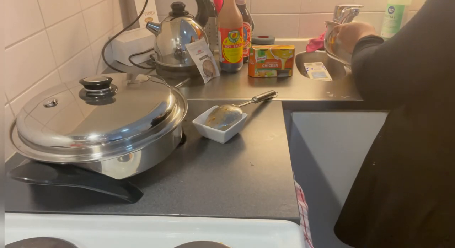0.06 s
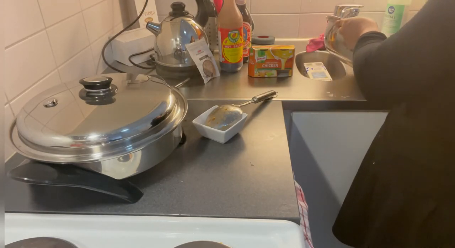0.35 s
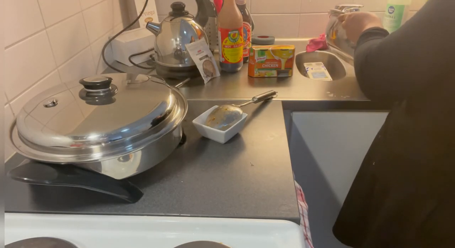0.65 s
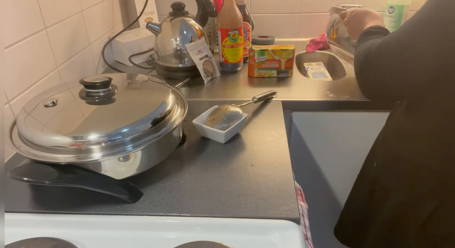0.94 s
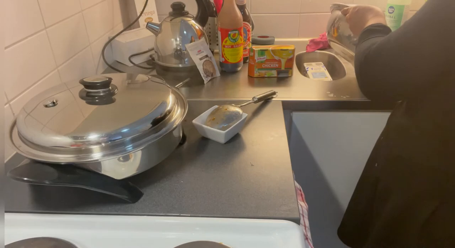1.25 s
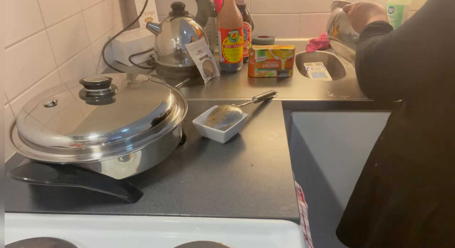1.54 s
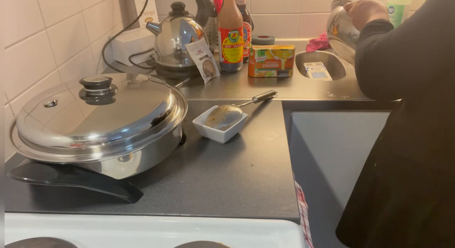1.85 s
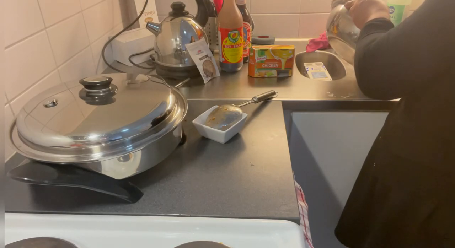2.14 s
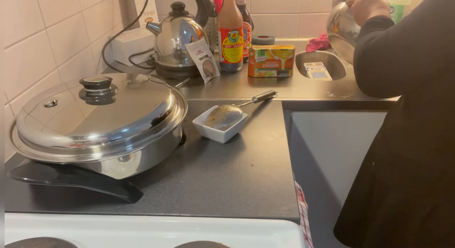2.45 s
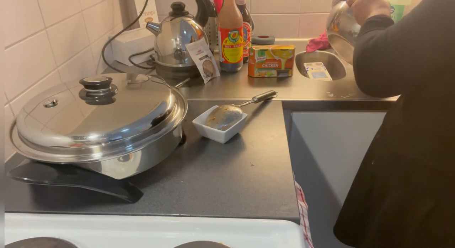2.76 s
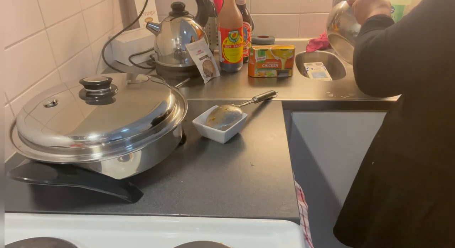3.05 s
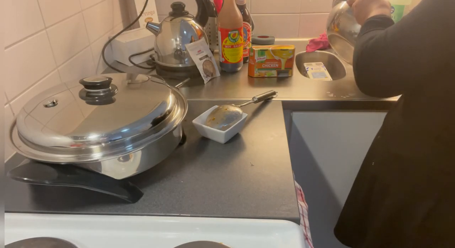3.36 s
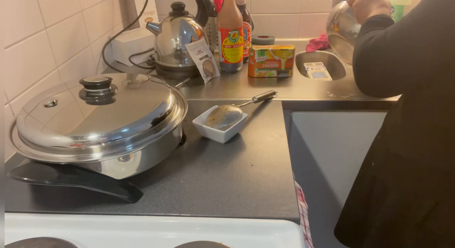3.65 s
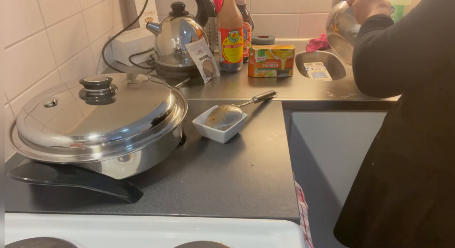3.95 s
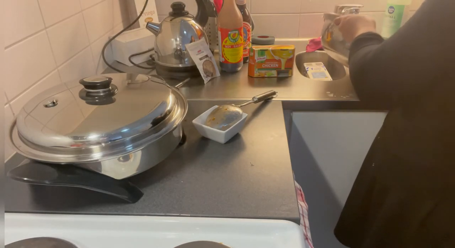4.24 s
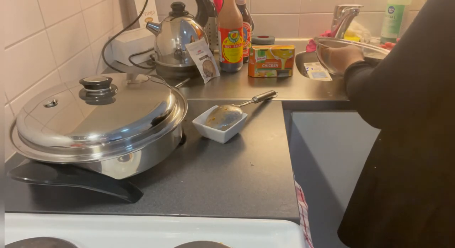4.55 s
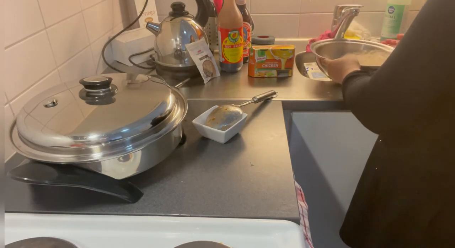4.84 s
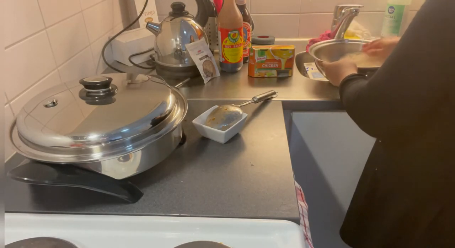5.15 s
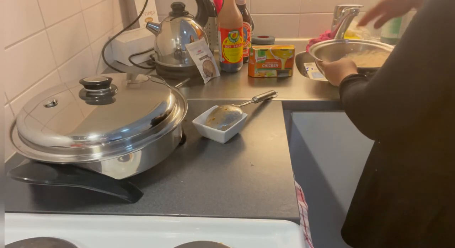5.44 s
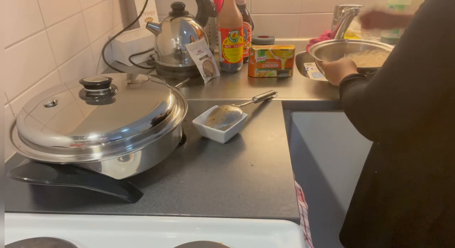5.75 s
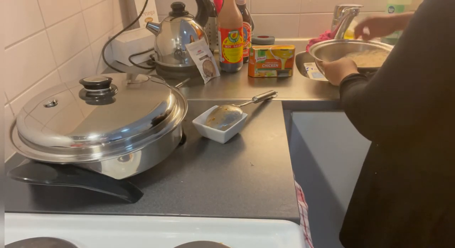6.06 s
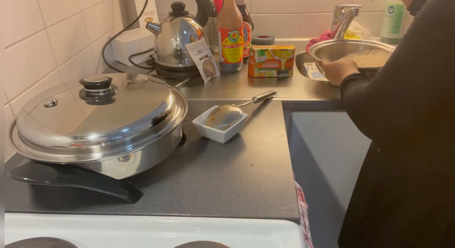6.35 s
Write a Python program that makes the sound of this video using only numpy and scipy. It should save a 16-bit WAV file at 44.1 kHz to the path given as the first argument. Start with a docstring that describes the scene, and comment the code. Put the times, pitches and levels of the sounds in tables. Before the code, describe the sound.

From the start, water pours from a steel bowl into a metal sink, splashing and fizzing with small ringing bubbles. The splash is fullest at about half a second and then gradually thins, while the water drums hollowly on the sink floor until about 3 seconds. Separate plinks and spatters stand out more as the stream dwindles, leaving faint drips by 4 seconds.

At about 4.3 seconds the bowl lands in the sink with a sharp, ringing clank and a low boom, the loudest sound. It is pushed along with an uneven low rumble from 4.5 to 5.4 seconds, knocking again at about 4.7 and 4.9 and settling with a light tap at 5.1. From 5.2 to 6.1 seconds a wet hand flicks a few faint drops onto the steel. The small tiled kitchen adds a short echo, and a low appliance hum continues throughout.

```python
"""Steel bowl emptied into a sink

Poured water splashes, fizzes with ringing bubbles, drums on the sink floor and thins to drips.
The bowl clanks down, ringing basin, sink and itself; it rocks, is pushed along and settles.
A wet hand flicks off a few drops. A small tiled kitchen rings briefly, over a low appliance hum."""
import sys
import numpy as np
from scipy import signal
from scipy.fft import rfft, irfft
from scipy.io import wavfile
from scipy.ndimage import uniform_filter1d

SR = 44100
rng = np.random.default_rng(int(sys.argv[2]) if len(sys.argv) > 2 else 0)


def dump_mix(stems):
    """Bounce the given channels to the path in sys.argv[1] as a 16-bit WAV at rate SR."""
    frames = np.atleast_2d(stems).T  # one column per channel
    limited = np.clip(frames, -1, 1)  # hard clip at full scale
    pcm = np.round(limited * 32767).astype(np.int16)
    wavfile.write(sys.argv[1], SR, pcm)


N = 282240

# appliance rumble: f/Hz, level/dB
HUM_SPECTRUM = [(12, -36.5), (20, -22.5), (101, 2.5), (195, -11), (281, -12.5), (338, -14.5), (375, -14.5),
                (555, -19.5), (600, -23.5), (1500, -25.5), (3850, -38.5), (4740, -38.5), (5550, -43),
                (7800, -50), (10400, -60), (13500, -97.5), (22000, -120)]
# sliding bowl: f/Hz, level/dB
SLIDE_SPECTRUM = [(30, -6.5), (80, 0), (130, 4.5), (190, -18), (290, -1.5), (430, -10), (700, -19.5),
                  (2500, -33), (9000, -47.5)]
# bowl on sink: t/s, force/dB, basin boom/dB, bowl ring/dB, rim-to-base tilt/s, hand damping/(dB/s)
BOWL_KNOCKS = [(4.3083, -13, -10, -40, 0.0066, 9), (4.715, -25.5, -14.5, -30, .011, 150),
               (4.785, -59, -25, -60, 0.0062, 260), (4.918, -34, -33, -20, .003, 24),
               (5.117, -48, -56, -40.5, .003, 3)]
# modes of basin floor, sink walls and bowl: f/Hz, level/dB, t60/s
BASIN_MODES = [(40, -17, .3), (73, -9, .4), (114, 0, .3), (138, -1, .1)]
SINK_MODES = [(203, -12, .35), (230, -12, .33), (291, -14, .42), (374, -5, .36), (402, -5, .17),
              (425, -5, .3), (462, -5, .17), (515, -6, .24), (603, -11, .3), (707, -9, .17),
              (947, -15, .18), (993, -16, .18), (1476, -21, .3), (1650, -21, .27), (1690, -19, .24),
              (2046, -21, .22), (2385, -24, .22), (2572, -26, .3), (3048, -27, .25), (3350, -30, .25),
              (4420, -32, .3), (5180, -33, .28), (6300, -33, .26), (7500, -32, .26)]
BOWL_MODES = [(286, -4, .08), (307, -6, .25), (420, -12, .2), (560, -10, .08), (842, -4, .16),
              (885, -8, .07), (955, -6, .1)]
# dense sheet-steel modes and contact crack: f/Hz, level/dB
CLATTER_SPECTRUM = [(100, -12), (170, -8), (240, -7), (320, -7), (410, 0), (520, -1), (620, -4), (780, -13),
                    (970, -7), (1250, -20), (1650, -15), (2200, -17), (3200, -26), (6000, -40)]
CRACK_SPECTRUM = [(500, -33.5), (1500, -1.5), (2300, 4.5), (3500, 8), (5000, 9.5), (7500, 5.5), (9500, -3),
                  (10500, -62)]
# contacts, relative to their knock: clatter/dB, crack/dB, ring/dB
RIM, BASE, SLAP, REBOUND = (-1.8, -12.5, -27.5), (0, -20, 0), (-9, -19.5, -27.5), (-23, -27, -21.5)
# droplet sprays on steel, from the bowl, then the hand: t/s, level/dB
SPRAYS = [(0.582, -29.5), (1.808, -35), (1.932, -36), (2.135, -39), (2.302, -41.5), (2.84, -43),
          (3.129, -44), (3.518, -47.5), (4.129, -52), (5.215, -50), (5.254, -50), (5.303, -57),
          (5.628, -50.5), (5.768, -51), (5.805, -42), (5.875, -54.5), (6.073, -54), (6.098, -51.5)]
# largest air pockets and drops: t/s, level/dB, f/Hz
LARGE_PLINKS = [(.226, -33, 4100), (.283, -28.5, 2014), (.585, -29.5, 2460), (.93, -33, 2306),
                (1.119, -33.5, 3990), (1.15, -30.5, 2520), (1.333, -37.5, 4380), (1.408, -32.5, 6730),
                (1.609, -36, 2300), (1.812, -36.5, 2220), (2.157, -38.5, 3430), (2.261, -40, 4600),
                (2.508, -49, 4100), (2.51, -44.5, 543), (2.643, -39, 2240), (2.838, -38, 5140),
                (3.131, -42, 4740), (3.174, -42, 6470), (3.947, -52.5, 4760), (4.169, -49, 2500)]
# splash envelope as the bowl empties: t/s, level/dB
SPLASH_ENVELOPE = [(0, -45), (.42, -40.5), (1.6, -48), (2.1, -53), (2.42, -59.5), (2.9, -60.5), (3.3, -70),
                   (4.25, -73.5)]
# splash, sink-floor drumming and bubble fizz: f/Hz, level/dB
SPLASH_SPECTRUM = [(400, -16.5), (700, -14.5), (1000, -9.5), (1500, -8), (2200, -10), (3000, -6),
                   (4200, -5), (5300, -9), (7000, -6), (8500, -6), (10400, -17.5)]
DRUM_SPECTRUM = [(200, -26), (300, 0.5), (450, 15), (600, 18), (760, -11), (980, 18.5), (1400, -33.5)]
FIZZ_SPECTRUM = [(1400, 0), (2400, 2.5), (4300, -.5), (6000, 4.5), (9500, -7)]
# stereo balance: f/Hz, left minus right/dB
BALANCE = [(30, -6), (110, 8), (200, 5.5), (330, -.5), (700, 1), (1500, -1), (3000, 1), (9000, 0)]

ROOM_T60_S, EMPTY_S = .42, 3.06


def undb(db):
    """Decibels to gain."""
    return 10 ** (np.asarray(db) / 20)


def unit(x):
    """Scale to unit rms."""
    return x / np.sqrt(np.mean(x ** 2))


def seconds(length_s):
    """Time axis."""
    return np.arange(int(length_s * SR)) / SR


def add(track, start_s, sound):
    """Mix a sound into a track."""
    i = max(int(start_s * SR), 0)
    track[..., i:i + sound.shape[-1]] += sound[..., :max(N - i, 0)]


def colour(x, spectrum):
    """Filter by points of f/Hz, level/dB."""
    hz, db = np.transpose(spectrum)
    bins_hz = np.fft.rfftfreq(x.shape[-1], 1 / SR)
    return irfft(rfft(x) * undb(np.interp(np.log(bins_hz + 1), np.log(hz), db)), x.shape[-1])


def diffuse(samples, alike_hz=480):
    """Diffuse stereo noise: alike in the bass, unrelated in the treble."""
    mid, side = rng.standard_normal((2, samples))
    side = signal.sosfilt(signal.butter(1, alike_hz, "high", fs=SR, output="sos"), side)
    return np.array([mid + side, mid - side])


def wander(rate_hz):
    """Smooth random drift, unit rms."""
    hold = int(SR / rate_hz)
    steps = np.repeat(rng.standard_normal(N // hold + 1), hold)[:N]
    return unit(uniform_filter1d(steps, hold))


def kitchen(x, direct_db, wet_db, early_db=3, early_t60_s=.072, left_lag_s=.00025):
    """Direct sound from the right, close reflections off sink and tiles, short room tail."""
    t = seconds(.43)
    decay = undb(-60 * t / ROOM_T60_S) + undb(early_db - 60 * t / early_t60_s)
    tail = diffuse(len(t), alike_hz=330) * decay * (t > .001)
    response = undb(wet_db) * tail / np.sqrt(np.sum(tail ** 2) / 2)
    response[0, int(left_lag_s * SR)] += undb(direct_db)
    response[1, 0] += undb(direct_db)
    return signal.fftconvolve(x[None], response, axes=1)


def hum(rumble_db=-53.5, tone_hz=97, tone_db=-66.5, waver_db=2):
    """Appliance: rumble and one wavering low tone."""
    rumble = unit(colour(diffuse(N), HUM_SPECTRUM)) * undb(rumble_db + .67 * wander(5.4))
    phase = 2 * np.pi * np.cumsum(tone_hz * (1 + .01155 * wander(3.054))) / SR
    tone = unit(np.sin(phase) * undb(waver_db * wander(6.4)))
    return rumble + tone * undb(tone_db)


def slide(start_s=4.5, end_s=5.373, level_db=-47, judder_db=3):
    """The bowl, pushed along the sink, rumbles unevenly."""
    effort = np.interp(np.arange(N) / SR, [start_s, start_s + .028, end_s - .35, end_s], [0, 1, 1, 0])
    rumble = unit(colour(diffuse(N), SLIDE_SPECTRUM))
    return rumble * effort * undb(level_db + judder_db * wander(29))


def ring(modes, t):
    """Struck steel: decaying sines, higher modes further apart in stereo phase."""
    out = 0
    for k, (hz, db, t60_s) in enumerate(modes):
        spread_rad = min(hz / 800, 1) * (.4 + rng.random()) * np.array([[-1], [1]])
        sign = (-1) ** k if hz > 350 else 1  # upper modes start in alternate directions
        out = out + sign * undb(db - 60 * t / t60_s) * np.sin(2 * np.pi * hz * t + spread_rad)
    return out


def impact_noise(spectrum, t, t60_s, tail_db):
    """Noise of a blow: a quick decay hands over to the room tail."""
    decay = undb(-60 * t / t60_s) + undb(tail_db - 60 * t / ROOM_T60_S)
    return unit(colour(diffuse(len(t)), spectrum)) * decay


def knocks(sink_db=1, rebound_s=.04):
    """Rim touches, base lands, far edge slaps, bowl rebounds; the steel rings, damped by the hands."""
    out, t = np.zeros((2, N)), seconds(.73)
    attack = 1 - np.exp(-t / .0022)
    basin = ring(BASIN_MODES, t) * (1 - np.exp(-t / .004))
    sink = ring(SINK_MODES, t) * attack
    bowl = ring(BOWL_MODES, t) * attack
    for start_s, force_db, boom_db, bowl_db, tilt_s, damping_db_per_s in BOWL_KNOCKS:
        modes = undb(boom_db) * basin + undb(force_db + sink_db) * sink + undb(bowl_db) * bowl
        modes *= undb(-damping_db_per_s * t)
        contacts = [(0, RIM), (tilt_s, BASE), (2 * tilt_s, SLAP), (rebound_s, REBOUND)]
        for delay_s, (clatter_db, crack_db, ring_db) in contacts:
            clatter = impact_noise(CLATTER_SPECTRUM, t, t60_s=.075, tail_db=-10.5) * attack
            crack = impact_noise(CRACK_SPECTRUM, t, t60_s=.067, tail_db=-13) * np.sqrt(attack)
            noise = undb(clatter_db) * clatter + undb(crack_db) * crack
            add(out, start_s + delay_s, undb(force_db) * noise + undb(ring_db) * modes)
    return out


def in_sink(water, steel_db=-16):
    """Water plus the faint ring it drives in the sink."""
    steel = ring(SINK_MODES, seconds(.4))
    steel /= np.sqrt(np.sum(steel ** 2) / 2)
    return water + undb(steel_db) * signal.fftconvolve(water, steel, axes=1)[:, :N]


def bubble(hz, decay_cycles, rise=.01):
    """Trapped air rings, rising in pitch as it nears the surface."""
    age = np.arange(int(5 * decay_cycles * SR / hz)) * hz / (SR * decay_cycles)  # in time constants
    envelope = np.exp(-age) * (1 - np.exp(-10 * age))
    return envelope * np.sin(2 * np.pi * decay_cycles * age * (1 + rise * age))


def air_pocket(hz, decay_cycles, scatter, span_s, bubbles):
    """Air breaks into one main bubble, then weaker ones of like size."""
    out = np.zeros(int(.1 * SR))
    for k, (detune, delay, size) in enumerate(rng.random((bubbles, 3))):
        follows = min(k, 1)
        bubble_hz = hz * np.exp(follows * scatter * (2 * detune - 1))
        tone = bubble(bubble_hz, decay_cycles) * (1 - follows * (.4 + .4 * size))
        i = int(follows * delay * span_s * SR)
        out[i:i + len(tone)] += tone[:len(out) - i]
    return out


def patter(hz, decay_s, grain_db=4, attack_s=.00067):
    """Water hits steel: a grainy burst, strongest around one pitch."""
    t = seconds(.1)
    grains = rng.standard_normal(len(t)) * undb(grain_db * rng.standard_normal(len(t)))
    spectrum = [(hz / 8, -16), (hz * .42, -12), (hz * .68, -3), (hz, 0), (hz * 1.5, -8)]
    return unit(colour(grains, spectrum)) * (1 - np.exp(-t / attack_s)) * np.exp(-t / decay_s)


def splash_level_db(t):
    """The splash swells, then thins."""
    return np.interp(t, *np.transpose(SPLASH_ENVELOPE))


def small_plinks(per_s=7, centre_hz=3000, spread_oct=.8, spread_db=3, stand_out_db_per_s=2):
    """Random air pockets that fade more slowly than the splash: t/s, level/dB, f/Hz."""
    rows = []
    for k, (when, size, pitch) in enumerate(rng.random((64, 3))):
        start_s = (k + when) / per_s
        if start_s < EMPTY_S:
            over_db = 5 + stand_out_db_per_s * start_s + spread_db * (2 * size - 1)
            hz = centre_hz * 2 ** (spread_oct * (2 * pitch - 1))
            rows.append((start_s, splash_level_db(start_s) + over_db, hz))
    return rows


def drops(tick_db=-4, plop_db=2):
    """Flung droplets patter; air pockets tick and plop."""
    out = np.zeros((2, N))
    for start_s, db in SPRAYS:
        burst = patter(hz=7630, decay_s=.0053)
        add(out, start_s, undb(db) * kitchen(burst, direct_db=-2.5, wet_db=2.5))
    for start_s, db, hz in LARGE_PLINKS + small_plinks():
        tick = undb(tick_db) * patter(hz, decay_s=.0028)
        decay_cycles = 14 * np.sqrt(hz / 3500)
        plop = undb(plop_db) * air_pocket(hz, decay_cycles, scatter=.16, span_s=.018, bubbles=6)
        for part in (tick, plop):
            add(out, start_s, undb(db) * kitchen(part, direct_db=-.5, wet_db=-3))
    return out


def churn(water, depth_db=1.64, full_hz=2000, frame=512):
    """The splash changes shape: neighbouring pitches flare and dip together, less so in the bass."""
    hz, _, cells = signal.stft(water, SR, nperseg=frame)
    flicker = rng.standard_normal(cells.shape[1:])
    for _ in range(2):
        flicker = uniform_filter1d(flicker, size=9, axis=0)
        flicker = uniform_filter1d(flicker, size=3, axis=1)
    share = np.minimum(hz / full_hz, 1)[:, None]
    cells = cells * undb(depth_db * share * unit(flicker))
    return signal.istft(cells, SR, nperseg=frame)[1][:, :N]


def drum_level_db(t, hold_db=-66, full_s=1, build_db_per_s=5, fade_db_per_s=18.5):
    """Drumming on the sink floor builds, holds while water falls, then dies away."""
    build_db = build_db_per_s * np.maximum(full_s - t, 0)
    fade_db = fade_db_per_s * np.maximum(t - EMPTY_S, 0)
    return hold_db - build_db - fade_db


def landing(density, spread_db=5.5, low_hz=1500, high_hz=9000):
    """One spot where water lands: tiny impacts and bubble pairs, fewer as the stream thins."""
    landed = rng.random(N) < density * 2200 / SR
    impacts = landed * rng.standard_normal(N)
    impacts *= undb(spread_db * np.minimum(rng.exponential(size=N), 4.5))
    fizz = np.zeros(N)
    for when, pitch, size, chance in rng.random((300, 4)):
        if chance < density[int(when * N)]:
            hz = low_hz * (high_hz / low_hz) ** pitch
            pair = air_pocket(hz, decay_cycles=15, scatter=.145, span_s=.02, bubbles=2)
            add(fizz, when * N / SR, np.exp(size) * np.sqrt(hz / 3000) * pair)
    return impacts / np.sqrt(density), fizz / np.sqrt(density)


def stream(spray_db=-3, fizz_db=-6, surge_db=1.76, run_off_s=2, spots=4):
    """Falling water splashes, fizzes and drums at several spots, each with its own echoes."""
    t = np.arange(N) / SR
    splash_db = splash_level_db(t)
    density = .15 + undb(splash_db - splash_db.max())
    splash_gain = undb(splash_db + surge_db * wander(25.31))
    drum_gain = undb(drum_level_db(t) + 2.6 * wander(20))
    out = 0
    for _ in range(spots):
        impacts, fizz = landing(density)
        spray = undb(spray_db) * unit(colour(impacts, SPLASH_SPECTRUM))
        fizz = undb(fizz_db) * unit(colour(fizz, FIZZ_SPECTRUM))
        drum = unit(colour(impacts, DRUM_SPECTRUM))
        spot = (spray + fizz) * splash_gain + drum * drum_gain
        out = out + kitchen(spot, direct_db=-5.5, wet_db=2)[:, :N]
    run_off = np.exp(-np.maximum(t - SPLASH_ENVELOPE[-1][0], 0) / run_off_s)
    return out * run_off / np.sqrt(spots)


def scene():
    """Pour and drips, bowl set down and pushed into place, appliance hum."""
    water = churn(stream()) + drops()
    return in_sink(water) + knocks() + slide() + hum()


def record(dry, ceiling=.92, top_hz=10400):
    """Upper bass leans left; peaks are rounded; the top is cut steeply."""
    left = colour(dry[0], [(hz, db / 2) for hz, db in BALANCE])
    right = colour(dry[1], [(hz, -db / 2) for hz, db in BALANCE])
    stereo = np.array([left, right])
    rounded = stereo / (1 + (stereo / ceiling) ** 6) ** (1 / 6)
    return signal.sosfilt(signal.ellip(10, .2, 70, top_hz, fs=SR, output="sos"), rounded)


dry = scene()
out = record(dry)
dump_mix(out)
```